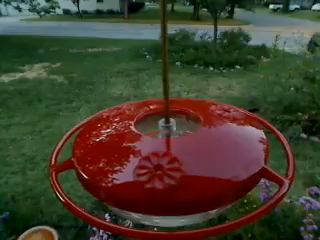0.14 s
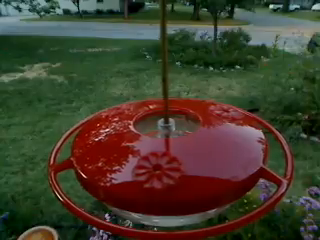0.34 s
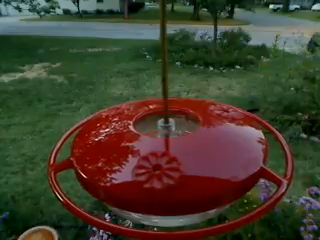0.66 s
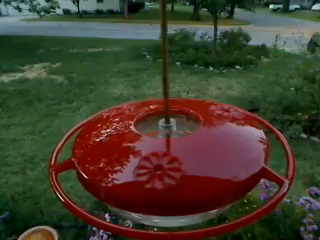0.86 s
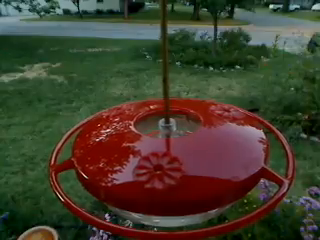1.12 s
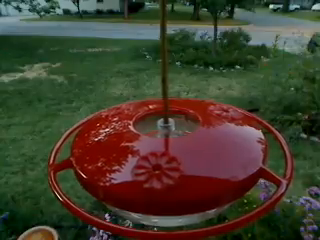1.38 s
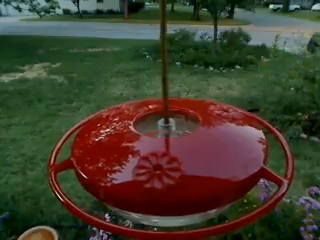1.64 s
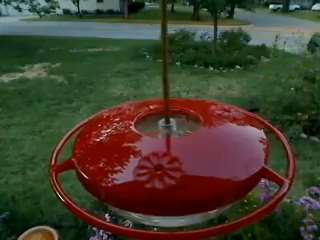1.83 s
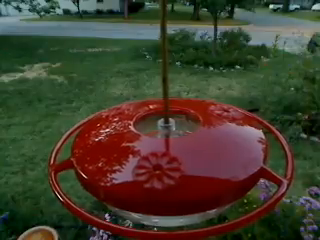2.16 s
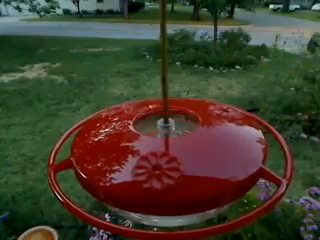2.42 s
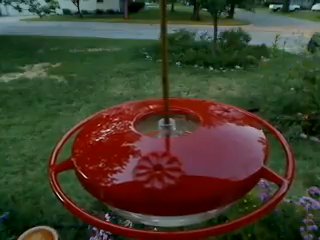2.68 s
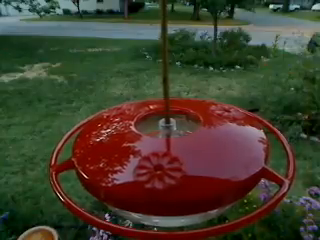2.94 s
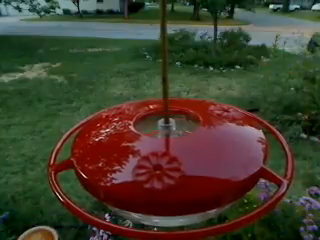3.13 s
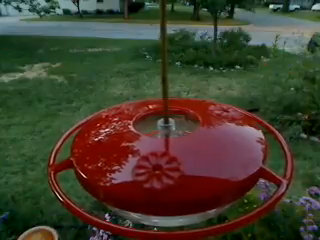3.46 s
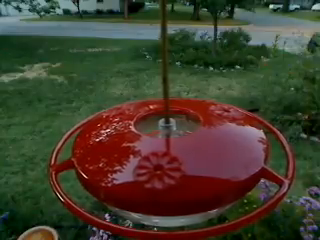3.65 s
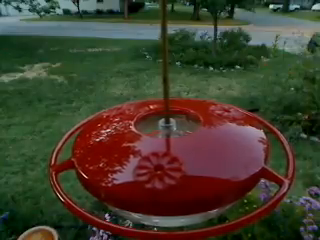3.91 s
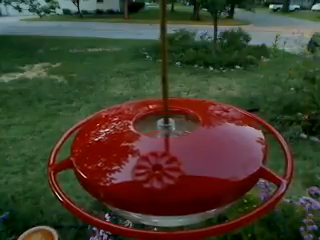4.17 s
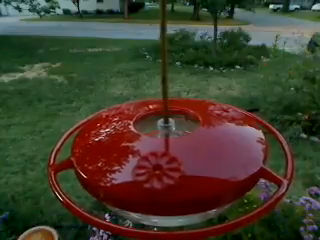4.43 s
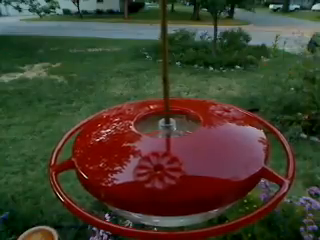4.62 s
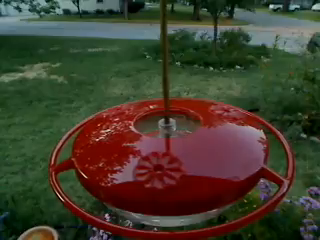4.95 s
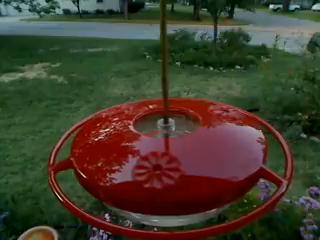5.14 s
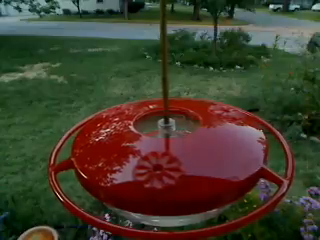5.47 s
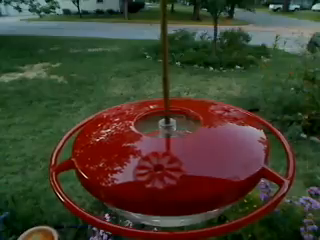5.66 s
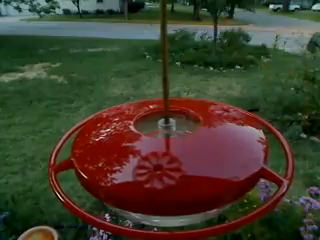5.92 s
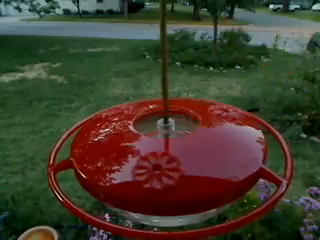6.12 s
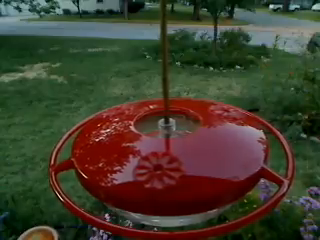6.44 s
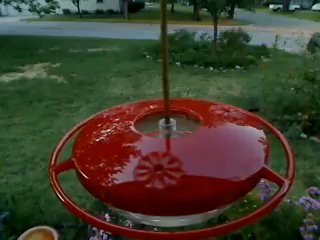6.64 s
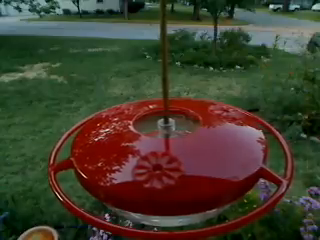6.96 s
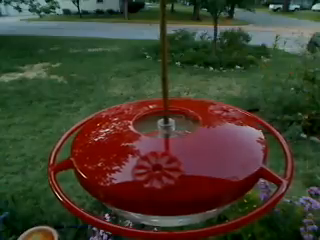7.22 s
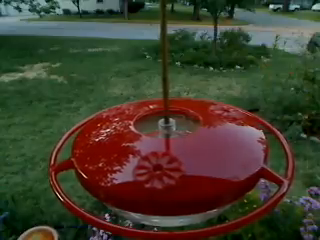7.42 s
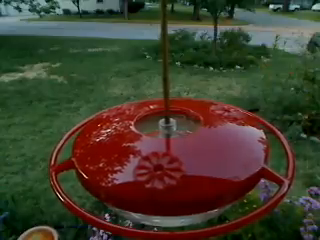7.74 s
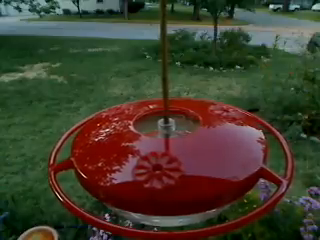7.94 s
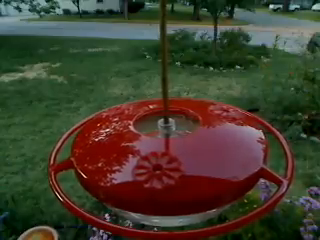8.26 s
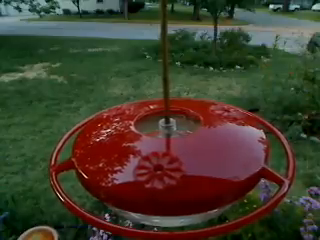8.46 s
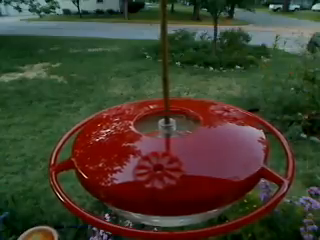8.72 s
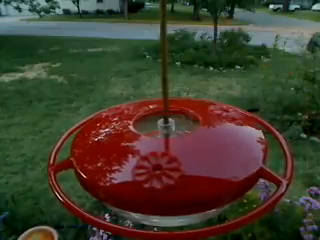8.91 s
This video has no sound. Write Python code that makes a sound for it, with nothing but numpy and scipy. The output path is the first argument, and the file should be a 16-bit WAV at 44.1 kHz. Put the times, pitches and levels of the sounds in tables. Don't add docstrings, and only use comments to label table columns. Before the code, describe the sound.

Outdoors in a quiet garden, a dense high-pitched insect chorus continues throughout, breathing only slightly in level. Weak crickets chirp at first, then stop. A distant narrow trill grows gradually in the second half. Very faint road rumble and electrical hum sit below. One momentary dropout and one sharp tick interrupt the otherwise constant shrill buzz, captured in mono by a small camera with a compressed, watery texture.

```python
import sys
import numpy as np
from scipy import signal
from scipy.fft import rfft, irfft, next_fast_len
from scipy.io import wavfile
from scipy.ndimage import map_coordinates

SR = 44100
rng = np.random.default_rng(int(sys.argv[2]) if len(sys.argv) > 2 else 0)


def file_out(sig):
    cols = np.atleast_2d(sig).T
    lim = np.clip(cols, -1, 1)
    pcm = np.round(lim * 32767).astype(np.int16)
    wavfile.write(sys.argv[1], SR, pcm)


def level_to_linear(level):
    exponent = np.asarray(level, float) / 20
    return 10 ** exponent


N = 400412
TOP_HZ = 7640
HOP = 1152


def unit(x):
    return x / np.sqrt(np.mean(x ** 2) + 1e-20)


def spectrum_gain(points, hz):
    point_hz, level_db = np.transpose(points)
    return level_to_linear(np.interp(np.log(hz + 1), np.log(point_hz + 1), level_db))


def curve(rows):
    return np.interp(np.arange(N) / SR, *np.transpose(rows))


def wobble(rate_hz):
    coarse = np.arange(0, N + 32, 32)
    knots = rng.standard_normal(N // 100)
    drift = map_coordinates(knots, [coarse * rate_hz / SR])
    return np.interp(np.arange(N), coarse, drift)


def filtered(x, response):
    size = next_fast_len(N + SR // 2)
    hz = np.fft.rfftfreq(size, 1 / SR)
    return irfft(rfft(x, size) * response(hz), size)[:N]


def ring(hz, centre_hz, width_hz):
    damping = 1j * hz * width_hz
    return damping / (centre_hz ** 2 - hz ** 2 + damping)


def hiss(response):
    return unit(filtered(rng.standard_normal(N), response))


# start_s, length_s
LOW_BAND_OPENINGS = [(0, 0.033), (.966, .088), (1.726, .056), (1.97, .11), (2.161, .114), (2.666, .062),
                     (2.8, .07), (3.588, .062), (4.033, .062), (4.436, .128), (5.019, .056), (5.25, .056),
                     (5.368, 0.051), (5.589, .122), (5.787, .056), (6.19, .116), (6.611, .138),
                     (6.894, .06), (7.599, 0.13), (7.772, .28), (8.12, .072), (8.291, 0.058), (8.507, .096),
                     (8.928, 0.071), (9.05, .05)]


def low_band_gate():
    start, length = np.transpose(LOW_BAND_OPENINGS)
    end = start + length
    fade = np.minimum(HOP / SR, length / 2)
    corners = np.array([start, start + fade, end - fade, end]).T.ravel()
    gate = curve(np.transpose([corners, np.tile([0, 1, 1, 0], len(start))]))
    open_gain = level_to_linear(-52 - 2.5 * wobble(12))
    return open_gain * np.sin(np.pi / 2 * gate) + level_to_linear(-98)


# frequency_hz, level_db (per Hz)
ROAD_COLOUR = [(225, -2.5), (280, -4), (400, -10.5), (600, -14), (1000, -18.5), (1400, -22), (1800, -17.5),
               (2100, -54)]
# frequency_hz, level_db (per Hz)
RUMBLE_COLOUR = [(12, -31.5), (25, -7), (40, -4), (60, -7), (80, -5), (105, -4.5), (125, -14)]
# pitch_hz, level_db (rms)
ELECTRIC_TONES = [
    (59.5, -49.5),
    (1293, -75.5),
]


def street():
    road = level_to_linear(-52 + .7 * wobble(5)) * hiss(lambda hz: spectrum_gain(ROAD_COLOUR, hz) * (hz > 223))
    rumble_gain = level_to_linear(-44.5 + 2 * wobble(10))
    rumble = rumble_gain * hiss(lambda hz: spectrum_gain(RUMBLE_COLOUR, hz) * (hz > 10) * (hz < 128))
    low_band = low_band_gate() * hiss(lambda hz: (hz > 126) & (hz < 223))
    t = np.arange(N) / SR
    tones = np.zeros(N)
    for pitch_hz, level_db in ELECTRIC_TONES:
        level = np.sqrt(2) * level_to_linear(level_db + 1.5 * wobble(7.1))
        tones += level * np.sin(2 * np.pi * pitch_hz * t + 0.53 * wobble(2.7))
    return road + rumble + low_band + tones


# time_s, level_db
TRILL_SWELL = [
    (0, -66),
    (4, -66),
    (4.8, -61),
    (5.6, -58),
    (6.5, -57),
    (7.2, -54.5),
    (8, -53.5),
    (9.08, -52.5),
]


def trill():
    level = level_to_linear(curve(TRILL_SWELL) + 1.5 + 1.5 * wobble(8))
    return level * hiss(lambda hz: ring(hz, 2345, 140) ** 2)


# start_s, length_s, pitch_hz, level_db
CHIRPS = [(.21, .13, 3712, -26), (.23, .09, 4110, -31), (.62, .1, 4380, -30), (.62, .1, 3560, -34),
          (.97, .1, 3712, -25), (1.0, .09, 4110, -32), (1.3, .09, 3560, -32), (1.34, .06, 3970, -30),
          (1.72, .11, 3712, -26), (1.76, .09, 4100, -31), (1.96, .09, 3570, -30), (2.0, .07, 4390, -31),
          (2.02, .06, 3970, -30), (2.1, .07, 3490, -32), (2.5, .11, 3700, -28), (2.68, .07, 3550, -32)]


def crickets():
    out = np.zeros(N)
    waver = .5 * wobble(30)
    for start_s, length_s, pitch_hz, level_db in CHIRPS:
        start = int(start_s * SR)
        t = np.arange(int(2 * length_s * SR)) / SR
        envelope = np.minimum(t / 0.0055, 1) * np.exp(-(t / length_s) ** 4)
        throb = 1 + 0.1 * np.sin(2 * np.pi * 35 * t)
        tone = np.sin(2 * np.pi * pitch_hz * t + waver[start:][:len(t)])
        out[start:][:len(t)] += level_to_linear(level_db) * envelope * throb * tone
    return out


# body_hz, click_rate_hz
SINGERS = [(3600, 240), (4100, 270), (4600, 190), (5000, 310), (5400, 250), (5900, 310), (6400, 200),
           (7000, 220)]
# frequency_hz, level_db (per Hz)
CHORUS_COLOUR = [(900, -120), (1850, -38), (2080, -29), (2350, -26.5), (2750, -23), (3100, -14),
                 (3570, -3.8), (4200, -3.3), (5000, -.4), (6000, -2.2), (6600, -7.4), (7100, -10.8),
                 (7450, -17), (7640, -24)]
# time_s, level_db
CHORUS_LEVEL = [(0, -20), (.3, -20), (.7, -19.5), (1.3, -20), (1.7, -20.5), (2.05, -20), (2.35, -20.5),
                (2.55, -20), (3.1, -20.5), (3.8, -21), (4.6, -21.4), (5.3, -21), (5.8, -21), (6.4, -21),
                (7, -21), (7.7, -21), (8.4, -21), (9.08, -21)]


def cicadas(width_hz):
    crowd = np.zeros(N)
    for body_hz, click_rate_hz in SINGERS:
        beats = np.cumsum(click_rate_hz * (1 + .04 * wobble(3)) / SR)
        uneven_beats = beats + .3 * wobble(300)
        clicks = np.diff(np.floor(uneven_beats), prepend=0) * rng.standard_normal(N)
        voice = level_to_linear(-9) * unit(clicks) + rng.standard_normal(N)
        swell = level_to_linear(0.27 * wobble(5.8) + 0.23 * wobble(10))
        crowd += filtered(voice * swell, lambda hz: ring(hz, body_hz, width_hz))

    def bodies(hz):
        power = sum(abs(ring(hz, body_hz, width_hz)) ** 2 for body_hz, _ in SINGERS)
        return np.sqrt(power) + 1e-3

    heard = filtered(crowd, lambda hz: spectrum_gain(CHORUS_COLOUR, hz) / bodies(hz))
    breathing_db = 0.79 * wobble(6) + 0.19 * wobble(9)
    return level_to_linear(curve(CHORUS_LEVEL) + breathing_db) * unit(heard)


def scene():
    mono = street() + trill() + crickets() + cicadas(width_hz=650)
    return np.tile(mono, (2, 1))


# low_hz, high_hz, low_step_db, high_step_db (rounding step over a line's usual size)
THINNED_BANDS = [(20, 140, -2, 9), (1263, 1531, 1, 3), (1531, 1837, 5, 1), (1837, 1990, 13, 9),
                 (1990, 2220, 7, 3), (2220, 2450, 8, 5), (2450, 2680, 9, 6), (2680, 2900, 12, 11),
                 (2900, 3215, 8, 1), (3215, 3828, 1, -6), (6900, 7580, -2, 10), (7580, 7640, 14, 14)]


def thinned(x):
    n = np.arange(2 * HOP) + .5
    line = np.arange(TOP_HZ * 2 * HOP // SR) + .5
    window = np.sin(np.pi * n / (2 * HOP))
    basis = np.sqrt(2 / HOP) * window * np.cos(np.pi / HOP * np.outer(line, n + HOP / 2))
    blocks = np.pad(x, (HOP, 2 * HOP - N % HOP)).reshape(-1, HOP)
    lines = np.hstack([blocks[:-1], blocks[1:]]) @ basis.T
    hz = line * SR / (2 * HOP)
    for low_hz, high_hz, low_step_db, high_step_db in THINNED_BANDS:
        band = (hz > low_hz) & (hz <= high_hz)
        step_db = np.interp(hz[band], [low_hz, high_hz], [low_step_db, high_step_db])
        frame_db = 2 * rng.standard_normal((len(lines), 1))
        step = np.std(lines[:, band], axis=0) * level_to_linear(step_db + frame_db)
        lines[:, band] = np.round(.85 * lines[:, band] / step) * step
    frames = lines @ basis
    return (frames[:-1, HOP:] + frames[1:, :HOP]).ravel()[:N]


# start_s, end_s
DROPOUT = (4.7788, 4.8366)
# time_s, level_db
GAP_SMEAR = [
    (4.7788, -19),
    (4.8, -22),
    (4.811, -42),
    (4.816, -70),
    (4.821, -48),
    (4.828, -37),
    (4.8366, -31),
]


def dropout(x):
    offset = .0165
    t = np.arange(N) / SR
    kept = (t < DROPOUT[0]) | (t > DROPOUT[1])
    smear = level_to_linear(curve(GAP_SMEAR)) * (x + level_to_linear(-27) * hiss(lambda hz: hz < TOP_HZ))
    gapped = filtered(np.where(kept, x, smear - offset), lambda hz: hz < TOP_HZ)
    burst = level_to_linear(-57) * np.exp(-((t - DROPOUT[1]) / .007) ** 2)
    restart = burst * hiss(lambda hz: (hz >= TOP_HZ) & (hz < 9300))
    return gapped + restart + offset


# time_s, level_db
SHARP_CLICK = (5.8975, -10.5)


def sharp_click():
    impulse = level_to_linear(SHARP_CLICK[1]) * (np.arange(N) == round(SHARP_CLICK[0] * SR))
    return filtered(impulse, lambda hz: np.exp(-(hz / 10000) ** 6))


def band_limit(x):
    return signal.sosfilt(signal.butter(12, 12600, fs=SR, output="sos"), x)


def record(dry):
    camera = level_to_linear(.3) * thinned(dry[0])
    mix = dropout(camera) + sharp_click()
    return band_limit(np.tile(mix, (2, 1)))


dry = scene()
out = record(dry)
file_out(out)
```